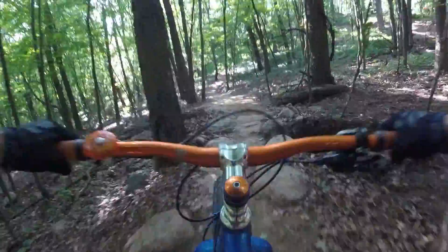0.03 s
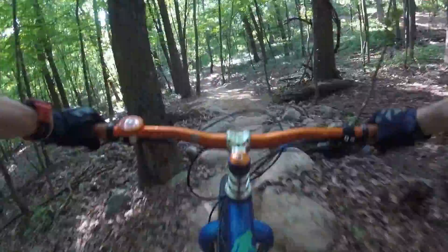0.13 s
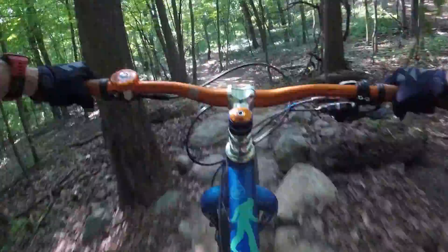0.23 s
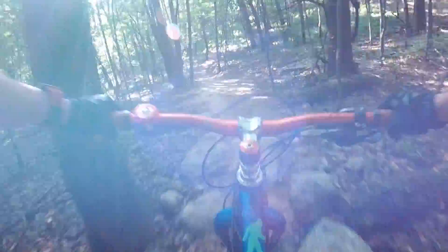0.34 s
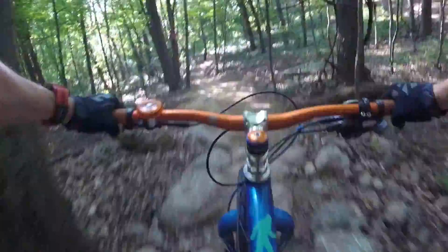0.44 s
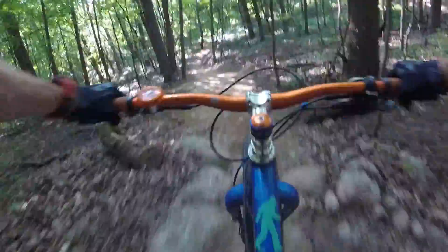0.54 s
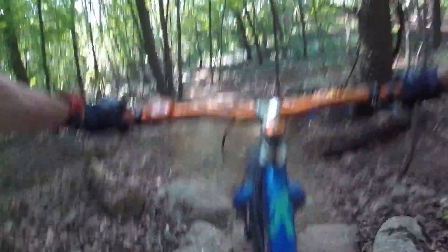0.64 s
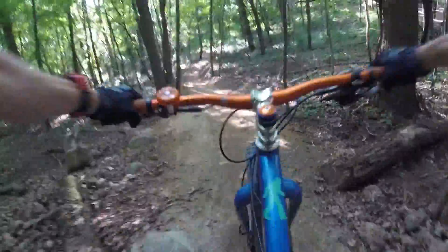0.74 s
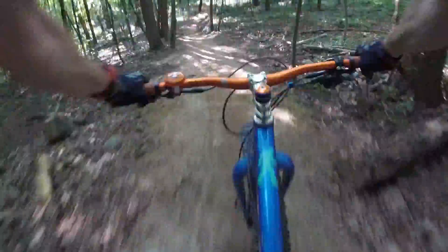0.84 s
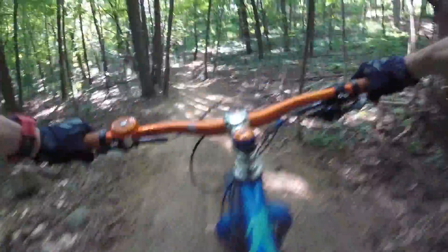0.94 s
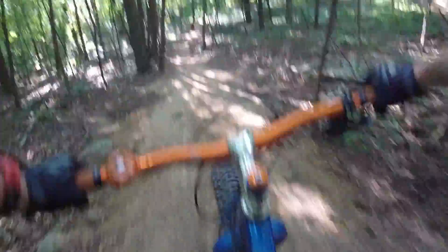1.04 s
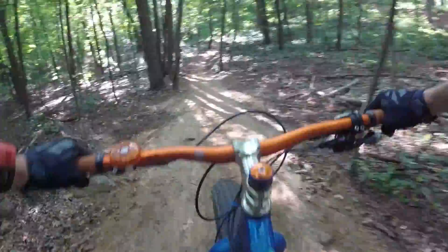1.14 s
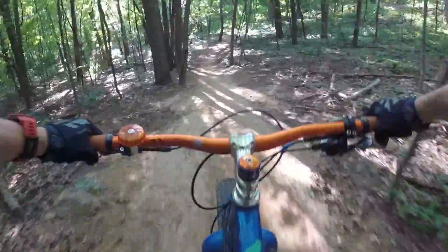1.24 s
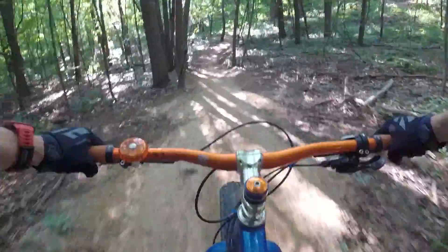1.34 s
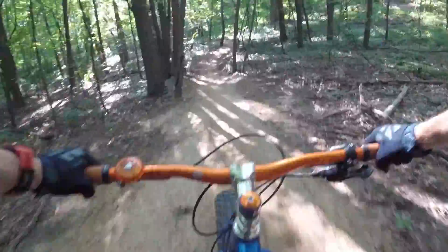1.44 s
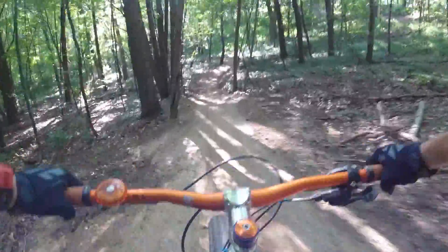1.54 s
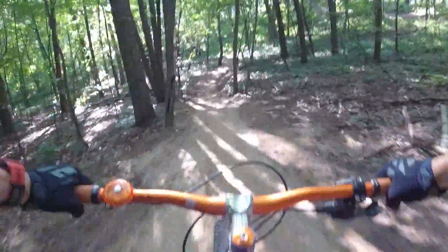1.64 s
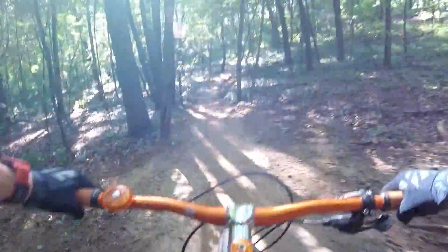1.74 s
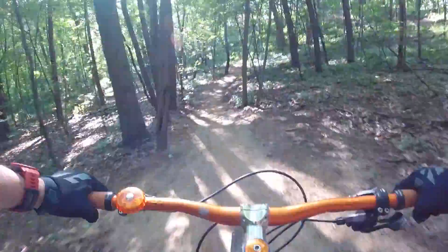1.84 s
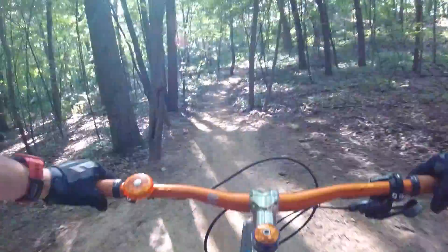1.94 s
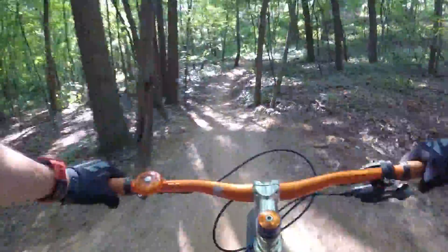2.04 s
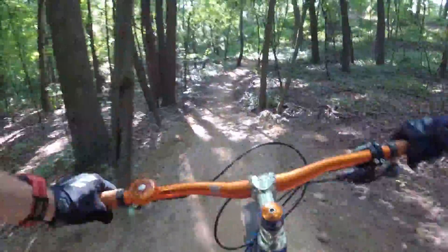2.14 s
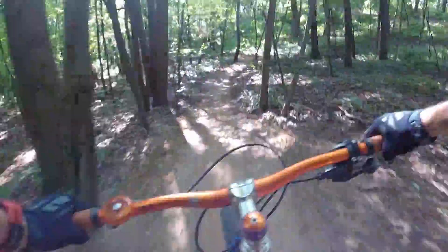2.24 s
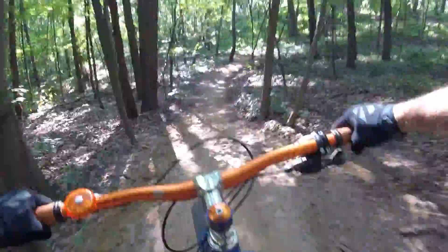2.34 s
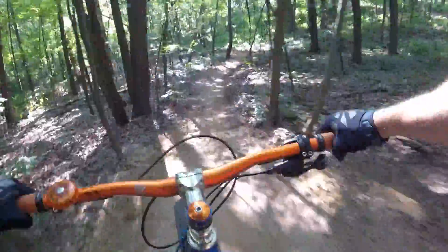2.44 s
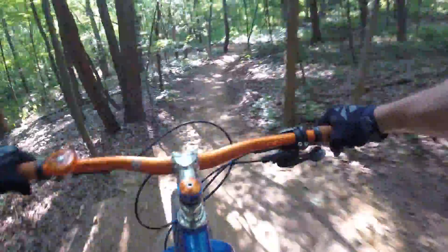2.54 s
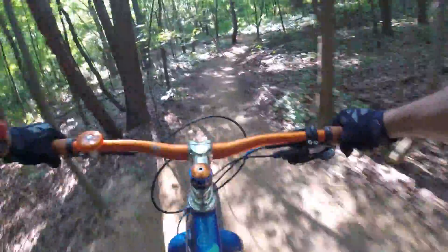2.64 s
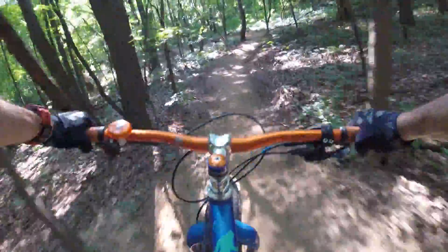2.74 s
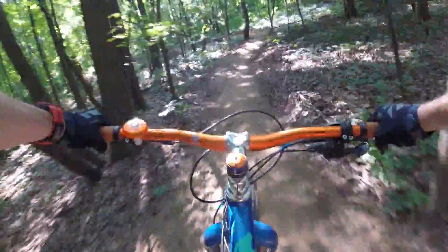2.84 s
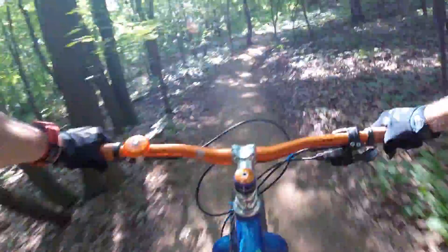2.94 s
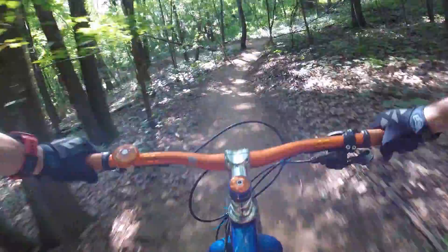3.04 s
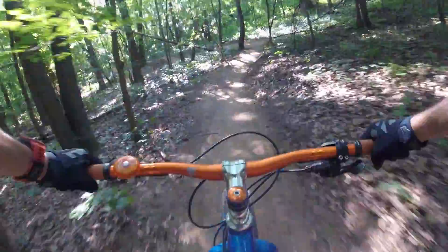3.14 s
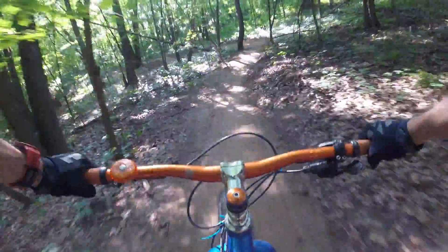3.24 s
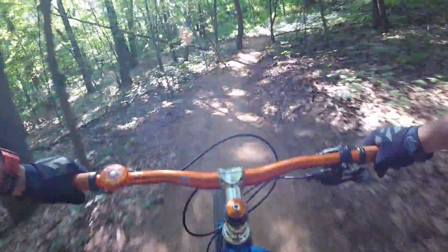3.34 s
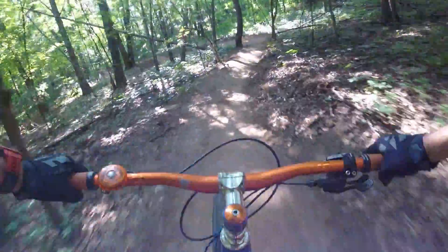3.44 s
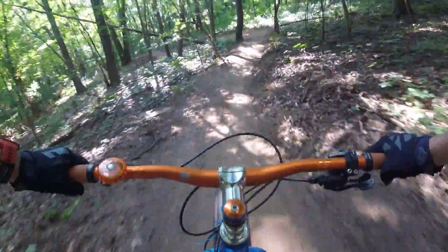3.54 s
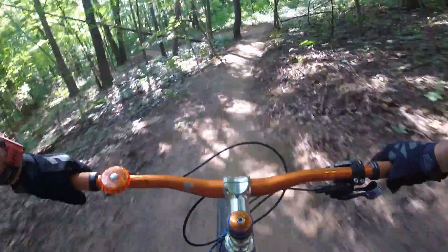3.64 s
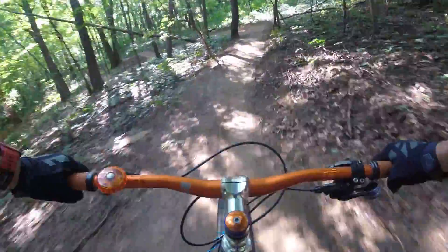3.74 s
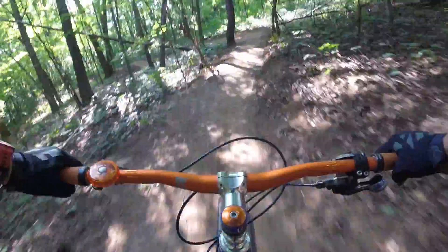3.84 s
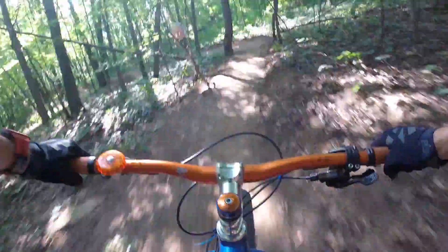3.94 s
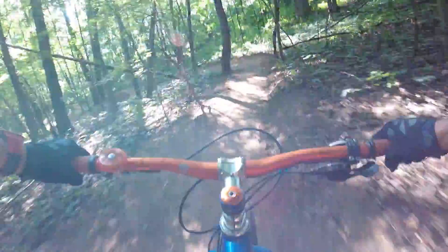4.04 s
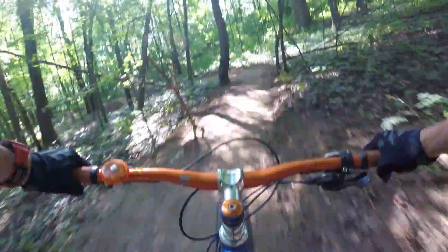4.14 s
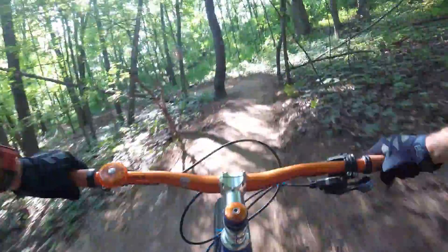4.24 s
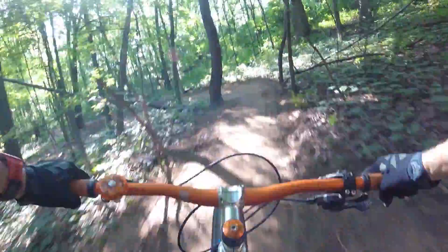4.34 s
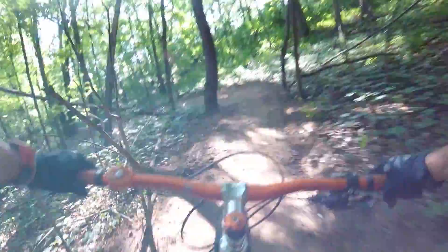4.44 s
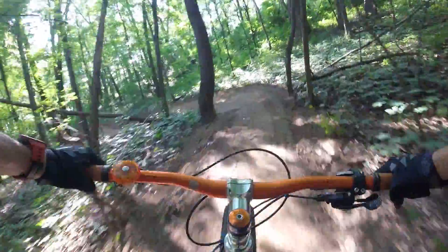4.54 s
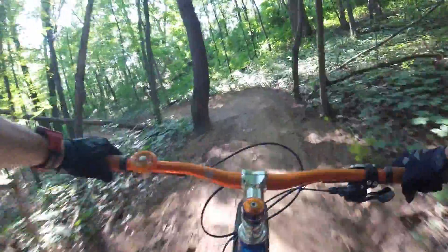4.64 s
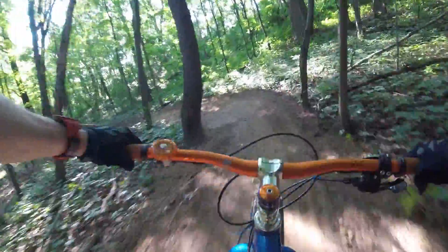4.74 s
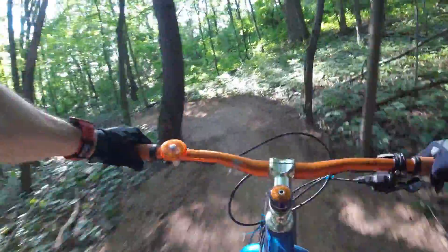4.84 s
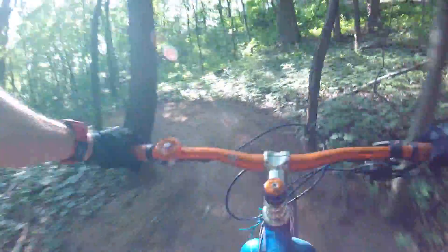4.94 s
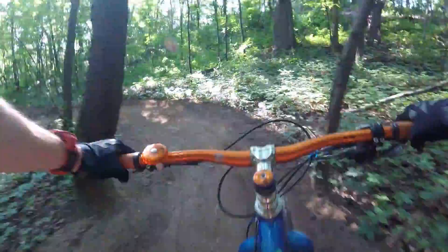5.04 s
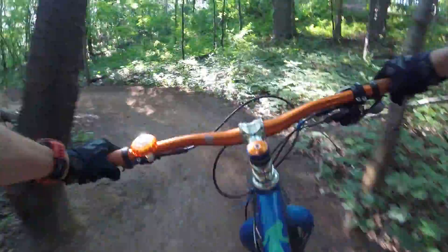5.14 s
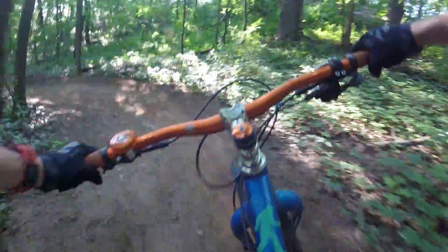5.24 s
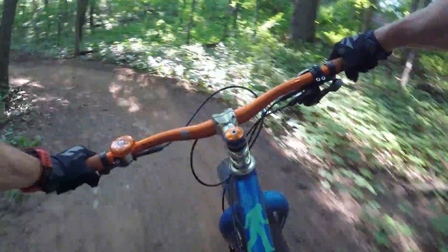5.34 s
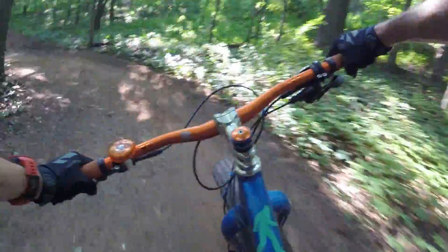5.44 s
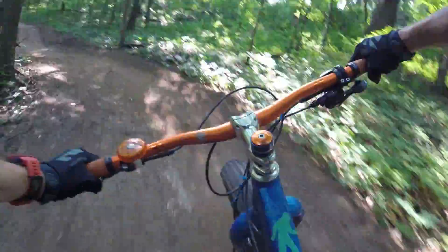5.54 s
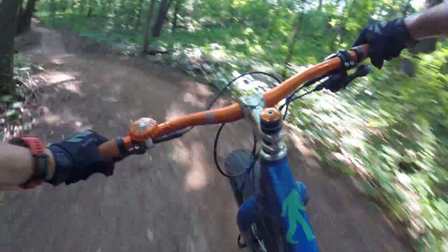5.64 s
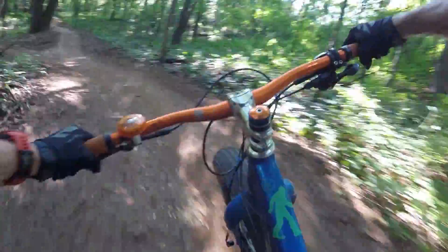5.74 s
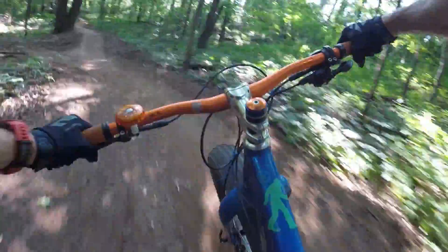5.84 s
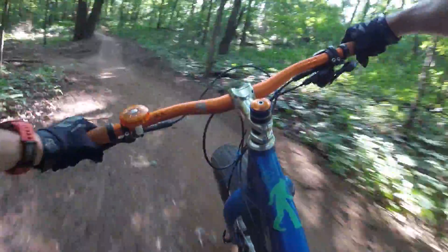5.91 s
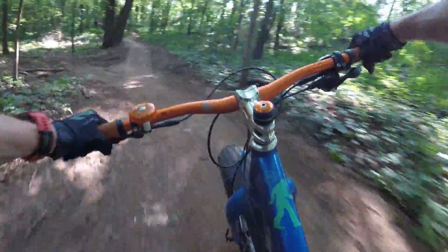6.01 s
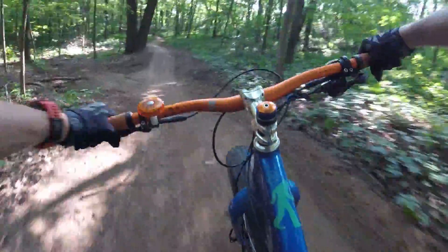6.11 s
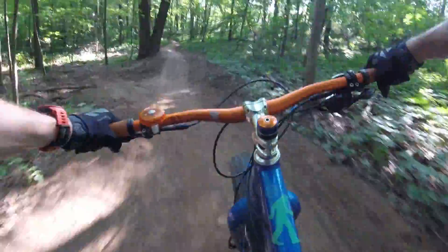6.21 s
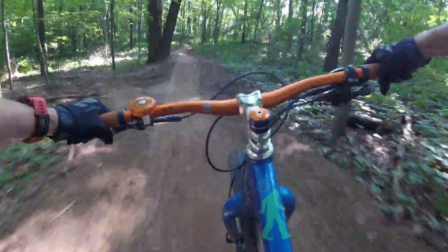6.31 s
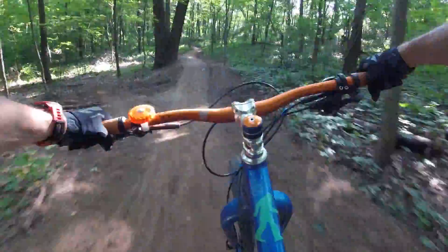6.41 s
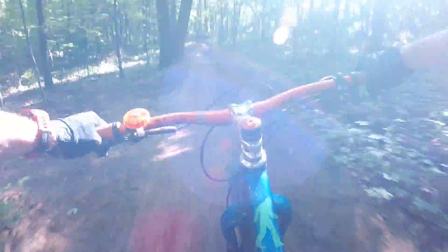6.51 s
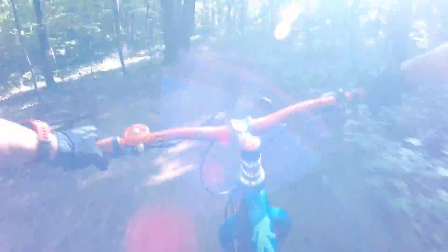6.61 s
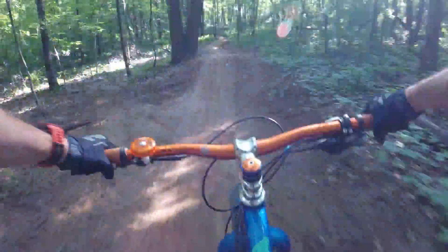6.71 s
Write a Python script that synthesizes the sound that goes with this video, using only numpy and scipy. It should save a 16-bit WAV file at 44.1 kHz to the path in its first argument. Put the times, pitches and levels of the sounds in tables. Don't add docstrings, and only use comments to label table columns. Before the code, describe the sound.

A mountain bike freewheels fast down a dirt forest trail, hub buzzing, chain rattling over rocks, wind thumping and rumbling heavily on a close microphone.

```python
import sys
import numpy as np
from scipy import signal
from scipy.io import wavfile
from scipy.ndimage import uniform_filter1d

SR = 44100
rng = np.random.default_rng(int(sys.argv[2]) if len(sys.argv) > 2 else 0)


def volts_from_db(level):
    exponent = np.asarray(level, float) / 20
    return 10 ** exponent


def wav_out(sig):
    wavfile.write(sys.argv[1], SR, np.round(np.clip(np.atleast_2d(sig).T, -1, 1) * 32767).astype(np.int16))


N = 298557


def rms_one(x):
    return x / np.sqrt(np.mean(x ** 2) + 1e-20)


def in_time(table):
    s, *columns = np.transpose(table)
    return [np.interp(np.arange(N) / SR, s, c) for c in columns]


def band(x, low_hz, high_hz):
    return signal.sosfilt(signal.butter(2, [low_hz, min(high_hz, .45 * SR)], "band", fs=SR, output="sos"), x)


def drift(rate):
    r = np.exp(-40 * np.pi * rate / SR)
    slow = signal.lfilter([1], [1, -2 * r, r * r], rng.standard_normal(N // 20 + 2002))[2000:]
    return np.interp(np.arange(N) / 20, np.arange(len(slow)), rms_one(slow))


def ring(clicks, hz, t60):
    r, w = volts_from_db(-60 / (t60 * SR)), 2 * np.pi * hz / SR
    return signal.lfilter([0, np.sin(w)], [1, -2 * r * np.cos(w), r * r], clicks + 1e-18)


def cycle(t, hz, width):
    turns = t * hz - 1.3
    return -np.cos(2 * np.pi * turns) * np.exp(-(turns / width) ** 2)


def banded_noise(spectrum, shared_db, own_db, rate):
    hz, db = np.transpose(spectrum)
    edges = hz[0] * 2 ** np.arange(0, np.log2(hz[-1] / hz[0]) + .3, 1 / 3)
    out, together, white = 0, drift(rate), rng.standard_normal((2, N + 4000))
    for k, (low, high) in enumerate(zip(edges, edges[1:])):
        level_db = np.interp(np.log(low * high) / 2, np.log(hz), db)
        gain = volts_from_db(level_db + shared_db * together + own_db * drift(rate))
        out = out + band(white[k % 2], low, high)[4000:] * gain
    return rms_one(out)


# [f/Hz, level/dB per Hz]
RUMBLE = [(11, -34), (18, 1), (70, 7.5), (107, 4), (190, -22.5), (250, -33), (320, -33), (550, -120)]
# [t/s, level/dB]
AIRFLOW = [(0, -17), (.3, -11), (.478, -22), (.57, -16.5), (.9, -15), (1.3, -15), (2.08, -16), (2.24, -20),
           (2.5, -7), (2.75, -24), (3.05, -13.5), (3.55, -24), (3.84, -15.5), (4.39, -25), (4.8, -18.5),
           (5.3, -16.5), (5.8, -16), (6.77, -18)]


def wind(gain_db, gust, eddies):
    rumble_db = in_time(AIRFLOW)[0] + gain_db - 6.8 * gust
    stirred = 1 + 2.3 * gust * uniform_filter1d(np.abs(eddies), size=1500)
    return volts_from_db(rumble_db) * stirred * banded_noise(RUMBLE, shared_db=2.2 * gust, own_db=6.5, rate=40)


# [f/Hz, level/dB per Hz]
ROAR = [(120, -24.5), (200, -4), (297, -8), (345, -6), (580, -15), (700, -21.5), (1180, -24), (1460, -58),
        (1900, -55), (2470, -53), (4180, -120)]


def tyres(drum_db, roar_db, gust, eddies):
    drum = rms_one(band(band(rng.standard_normal(N), 66.7, 165.0), 92.4, 335)) * volts_from_db(2.2 * gust * drift(12.6))
    air_hz, air_width_hz = 296.5, 29
    hum = rms_one(band(rng.standard_normal(N), air_hz - air_width_hz / 2, air_hz + air_width_hz / 2))
    hum_gain = volts_from_db(-8 + 4.5 * gust + 1.7 * drift(14.0))
    roar = banded_noise(ROAR, shared_db=3.7 * gust, own_db=2.5, rate=43)
    flare = 1 + 3.3 * gust * uniform_filter1d(np.abs(eddies), size=500)
    sizes = volts_from_db(3.0 * np.minimum(rng.exponential(1, N), 3)) * rng.choice([-1, 1], N)
    grains = sizes * (rng.random(N) < 350 / SR) + 1e-18
    grit = rms_one(band(band(grains, 247, 1230), 260, 1260))
    contact = flare * volts_from_db(-1.5) * (roar + volts_from_db(-8.5) * gust * grit)
    return volts_from_db(drum_db) * drum + volts_from_db(roar_db) * (hum_gain * hum / flare + contact)


# [f/Hz, level/dB per Hz]
PAWL_HISS = [(1410, -37), (2400, -2.5), (2910, -13), (3290, 4), (3890, -4), (5250, -5), (7130, -9),
             (7760, -8), (8380, -16), (9990, -13.5), (11900, -21), (13800, -26), (15000, -33)]
# [f/Hz, level/dB, t60/s]
HUB_MODES = [(1940, 0, .03), (2380, -2, .03), (3265, -3, .03), (3670, -8, .025), (4420, -5, .03),
             (5060, -5, .025), (7820, -9, .015), (9790, -11, .02), (10250, -11, .015), (13020, -21, .015)]
# [t/s, pawl clicks/(1/s)]
WHEEL = [(0.0, 69.6), (0.17, 67.3), (0.32, 59.5), (1.02, 50.2), (1.24, 62.9), (1.68, 63.0), (2.04, 74.5),
         (3.77, 84.4), (4.05, 96.7), (4.37, 85.3), (4.66, 85.9), (5.07, 76.2), (5.39, 77.8), (5.66, 86.8),
         (6.6, 74.0), (6.77, 76.0)]


def freewheel(hiss_db, buzz_db):
    tooth = np.cumsum(in_time(WHEEL)[0] * (1 + .012 * drift(8))) / SR
    at = np.flatnonzero(np.diff(np.floor(tooth)))
    chance = rng.standard_normal((len(at), 1 + len(HUB_MODES)))
    clicks = np.zeros(N)
    clicks[at] = volts_from_db(1.8 * chance[:, 0])
    fall = np.exp(-1 / (.004 * SR))
    puff = rms_one(signal.lfilter([1], [1, -fall], signal.lfilter([.015], [1, -.985], clicks)))
    hiss = rms_one((.5 + puff) * banded_noise(PAWL_HISS, shared_db=.6, own_db=1.8, rate=45))
    buzz = rms_one((0.79 + puff) * band(band(rng.standard_normal(N), 1740, 2700), 1000, 2300))
    shell = 0
    for k, (hz, db, t60) in enumerate(HUB_MODES):
        struck = clicks.copy()
        struck[at] *= volts_from_db(db + 4.0 * chance[:, k + 1] + 2.5 * drift(7)[at])
        shell = shell + band(ring(struck, hz, t60), .95 * hz, 1.05 * hz)
    return volts_from_db(hiss_db) * (hiss + volts_from_db(-5.0) * rms_one(shell)) + volts_from_db(buzz_db) * buzz


def shade(hub, treble_db, spoke_db):
    treble, spokes = band(hub, 8450, 16900), band(hub, 3040, 3780)
    return hub + (volts_from_db(treble_db) - 1) * treble + (volts_from_db(spoke_db) - 1) * spokes


def rush(level_db, gust):
    low_hz, high_hz = 677, 1400
    noise = band(band(rng.standard_normal(N), low_hz, high_hz), 1.15 * low_hz, high_hz)
    return volts_from_db(level_db - 17.5) * (1 - 0.23 * gust) * rms_one(noise)


# [t/s, level/dB, f/Hz]
CLACKS = [(.0613, -31, 1600), (.1172, -24, 1230), (.1671, -22, 1280), (.3155, -23, 1210),
          (.3651, -21, 1360), (.4215, -18, 960), (.623, -13.5, 1140), (.7023, -21.5, 1400),
          (.7477, -21, 1010), (.8385, -20, 1100), (.9613, -24, 1030), (2.191, -32, 800),
          (4.5885, -24, 1000), (4.613, -25, 1280), (4.835, -21.5, 1400), (5.027, -24, 885),
          (6.36, -20, 1140)]


def clacks():
    out, click = np.zeros(N), np.eye(1, 3000)[0]
    t60_s, modes = 0.033, [(0.97, 0), (1.7, -8), (2.9, -22)]
    for s, db, hz in CLACKS:
        at = round(s * SR)
        for ratio, mode_db in modes:
            out[at:at + len(click)] += volts_from_db(db + mode_db) * ring(click, hz * ratio, t60_s / ratio)
    return out


# [t/s, rattle level/dB, t60/s, knock level/dB]
RATTLES = [(0.1181, -14, 0.21, -16.5), (0.165, -15.5, 0.38, -14), (0.24, -19, 0.031, -26),
           (0.316, -12, 0.12, -22), (0.365, -3.5, 0.14, -16), (.415, -5, 0.085, -22),
           (.498, -10, 0.14, -12), (0.5486, -12, 0.28, -6), (0.5758, -13, 0.03, -11.5),
           (0.623, 0, 0.055, -28), (0.699, -13, 0.27, -36), (0.837, -9, 0.14, -23),
           (0.916, -10, 0.055, -12), (2.3212, -14.5, 0.056, -14), (2.4386, -12, 0.017, -30),
           (4.8312, -18, 0.063, -10), (5.028, -11, 0.021, -28), (5.107, -37.5, 0.37, -41)]


def rattles():
    out, t = np.zeros(N), np.arange(6000) / SR
    hz = 1086
    for s, peak_db, t60, _ in RATTLES:
        sizes = volts_from_db(8.2 * np.minimum(rng.exponential(1, len(t)), 3)) * rng.choice([-1, 1], len(t))
        clicks = sizes * (rng.random(len(t)) < 3500 / SR) + 1e-18
        body = rms_one(band(band(clicks, .5 * hz, 1.49 * hz), 0.048 * hz, 2.8 * hz))
        links = rms_one(band(clicks[::-1], 1400, 3560))
        fade = volts_from_db(peak_db - 12.5 - 60 * t / max(t60, .01)) * np.minimum(t / 0.00093, 1)
        at = round(s * SR)
        out[at:at + len(t)] += fade * (body + volts_from_db(-16.5) * links)
    return out


# [t/s, peak level/dB, brightness/dB]
STONES = [(0.4049, -26, 16), (0.4186, -21, 2), (0.4316, -28, -1), (0.4573, -17, -3),
          (0.4674, -11.5, -8), (0.9727, -5, -3), (2.1903, -14.5, -21), (2.2138, -25, -9),
          (2.2611, -15, -15), (2.3072, -19, -6), (2.3225, -35, -8), (2.3952, -24, -13),
          (2.4288, -28, -6), (2.4364, -9.5, -11), (2.506, -17, -7), (2.5612, -12, -13),
          (2.5857, -21, -1), (2.5954, -13, -14), (2.6218, -14.5, -11), (2.7509, -15, -8),
          (2.9029, -4.5, -16), (2.929, -16, -7), (2.938, -15, -6), (2.9456, -26, -7),
          (2.9563, -13.5, -13), (2.975, -16, -8), (2.9957, -7, -19), (3.0118, -4.5, -17),
          (3.04, -7.5, 4.5), (3.0636, -25, -12), (3.1, -9, 1), (3.1212, -16, -4), (3.1494, -16, 12),
          (3.156, -12, -7), (3.1657, -28, -12), (3.173, -10.5, 7), (3.1826, -25, -12),
          (3.2004, -18, -9), (3.2081, -9.5, -12), (3.2229, -17, 2), (3.2325, -21, -9),
          (3.2412, -25, -4), (3.2506, -7.5, 11), (3.2592, -7, 4), (3.2873, -15, -10),
          (3.2953, -11.5, 4), (3.326, -8.5, 3), (3.3838, -9.5, 5), (3.3993, -8.5, -5),
          (3.417, -14.5, 7), (3.4244, -9, 0), (3.5043, -20, 9), (3.536, -23, 12), (3.57, -21, 11),
          (3.5887, -14, -4),
          (3.6056, -11, 3), (3.6529, -16, 8.5), (3.6837, -11, -13), (3.7076, -8, 3.5),
                 (3.7204, -13, 3), (3.7416, -19, -7), (3.7603, -15, -10), (3.7797, -11.5, -1),
                 (3.7868, -11, 6), (3.8086, -11.5, -2), (3.8241, -17, -5), (3.8341, -10.5, 3),
                 (3.8538, -17, -4), (3.8882, -16, 0), (3.9034, -15.5, 2), (3.9157, -14, -6),
                 (3.9281, -8, -2), (3.9438, -21, -8), (4.0707, -10, 5.5), (4.0971, -19, 14),
                 (4.1178, -15, -7), (4.1507, -22, -2), (4.1662, -24, 1), (4.1863, -15, -5),
                 (4.2051, -10, -12), (4.2228, -8.5, 0), (4.2566, -12, -7), (4.2666, -8.5, -1),
                 (4.2814, -10.5, -3), (4.3305, -14, 3), (4.3421, -28, -5), (4.3512, -14, 8),
                 (4.363, -19, -14), (4.3744, -10.5, 6.5), (4.413, -19.5, 9.5), (4.4581, -19, -5),
                 (4.5875, -7, 6), (4.611, -13, -8), (4.8055, -18, 0), (4.815, -10.5, -2), (4.8365, -10, 0),
                 (4.8449, -12, -13), (4.8536, -19, -7), (4.8612, -18, 7), (4.9027, -24, -12),
                 (4.9152, -17, 3), (4.9345, -8, -7), (4.9486, -11.5, -15), (4.9752, -7, -11),
                 (4.9902, -10, -9), (5.0294, -9, 2), (5.085, -26, -8), (6.3629, -13, -0.5),
                 (6.5708, -15, -5), (6.5829, -17.5, 15.5),
          (1.972, -21.5, -12), (2.284, -22, 0), (2.484, -18, -4), (2.898, -12, -8), (3.637, -20, -4),
          (4.244, -13, -5), (4.886, -22, 0), (5.083, -26, -8), (5.133, -21.5, -8), (5.175, -22.5, -10),
          (5.204, -25, -9), (5.226, -15.5, -13)]


def snaps():
    knocks = [(s, knock_db, -1) for s, _, _, knock_db in RATTLES]
    rows = knocks + STONES
    t, lead = np.arange(1800) / SR, .012
    out, spread = np.zeros(N + len(t)), volts_from_db(.8 * rng.standard_normal((len(rows), 2)))
    noise = band(band(rng.standard_normal((len(rows), len(t))), 317, 1190), 363, 1230)
    swell_s, fade_s = np.maximum(lead + 0.0024 - t, 0), np.maximum(t - lead - .003, 0)
    envelope = np.exp(-fade_s / 0.0036 - swell_s / 0.003)
    for (s, snap_db, bright_db), rough, (dull, sharp) in zip(rows, noise, spread):
        bright = volts_from_db(bright_db - 14.0) * cycle(t - lead - .0003, 1550 * sharp, 0.98)
        snap = cycle(t - lead, 650 * dull, 0.27) + bright
        at = round((s - lead) * SR)
        out[at:at + len(t)] += volts_from_db(snap_db + 0.5) * (snap + volts_from_db(-9.5) * rms_one(rough) * envelope)
    slam_s, slam_db, slam_hz = .9862, 2.5, 560
    at = round((slam_s - 0.82 / slam_hz) * SR)
    out[at:at + len(t)] += volts_from_db(slam_db) * cycle(t, slam_hz, .6)
    return out[:N]


# [t/s, level/dB, t60/s]
SLAPS = [
    (0.244, -39, 0.032),
    (0.407, -31, 0.03),
    (.55, -43, .12),
    (.623, -40, 0.029),
    (5.026, -32.5, 0.033),
    (5.071, -66, 0.23),
]


def slaps():
    out, t = np.zeros(N), np.arange(6000) / SR
    for s, db, t60 in SLAPS:
        clicks = rng.standard_normal(len(t)) * (rng.random(len(t)) < 900 / SR) + 1e-18
        jingle = sum(rms_one(ring(clicks, hz, 0.0059)) for hz in (3380, 5030))
        tick = 0.91 * rms_one(band(clicks, 3100, 6200))
        at = round(s * SR)
        out[at:at + len(t)] += volts_from_db(db - 60 * t / max(t60, .01)) * (jingle + tick)
    return out


# [t/s of the dip, swing level/dB, dip-to-push time/ms]
EDDIES = [(0.2984, -8, 3.6), (0.3056, -15, 3.0), (0.3875, -11, 5.4), (0.4098, -13.5, 4.8),
          (0.4268, -5.5, 2.6), (0.4524, -6, 2.3), (0.4943, -2.5, 3), (0.5074, -6, 5.4),
          (0.6507, -16, 3.6), (0.6628, -2.5, 2), (0.979, -5.5, 2.05), (0.991, -3, 4),
          (1.973, -6.5, 5.6), (2.1815, -7.5, 5.5), (2.2125, -6, 10), (2.2239, -1.5, 6.7),
          (2.2384, -9, 6.3), (2.2641, -9.5, 2.6), (2.2999, 1, 8.9), (2.3088, -3, 13),
          (2.3299, -4.5, 27), (2.3567, -16, 3.6), (2.3991, -6.5, 13), (2.4239, -7, 3.8),
          (2.4394, -12, 5), (2.4712, -8.5, 3.3), (2.501, -6.5, 20), (2.518, -24, 4.6),
          (2.5629, -10.5, 1.9), (2.5824, -2.5, 8.6), (2.6251, -5.5, 3.3), (2.6409, -7, 3.9),
          (2.899, -4, 16), (2.9129, -3, 3.5), (2.9411, -3, 1.64), (2.998, -9, 4.0),
          (3.015, -5.5, 1.9), (3.0231, -17.5, 5.5), (3.033, -6, 12), (3.0569, -10.5, 4.7),
          (3.067, -5.5, 4.5), (3.0804, -13, 2.4), (3.0966, -1, 8.1), (3.1217, -3.5, 2.5),
          (3.1536, -11, 4.1), (3.1611, -8, 5.6), (3.1721, -0.5, 2.1), (3.1815, -8, 4.4),
          (3.2067, -8, 3.9), (3.2253, -16, 3.9), (3.2483, -7.5, 4.7), (3.2643, -16, 3.4),
          (3.2971, -8, 4.7), (3.326, -5, 3.6), (3.3384, -7.5, 5.7), (3.3483, -5.5, 2),
          (3.3808, -7, 3.3),
          (3.3896, -13, 3.3), (3.3971, -3, 3.1), (3.4159, -5.5, 2.6), (3.4273, -10.5, 7),
                 (3.4359, -7.5, 2.5), (3.496, -8, 5.2), (3.5385, -6.5, 5.4), (3.554, -10, 2.6),
                 (3.5616, -5, 7.3), (3.5704, -4.5, 1.74), (3.5908, -4, 1.5), (3.6093, -3, 2.1),
                 (3.6862, -5.5, 4.4), (3.694, -7, 1.8), (3.7092, -12, 3.5), (3.7226, -6, 4.1),
                 (3.7451, -7, 11), (3.778, -8, 3.8), (3.7914, -4.5, 1.75), (3.8248, -4.5, 3.7),
                 (3.837, -12, 1.9), (3.8572, -2, 2.7), (3.9117, -9, 6.9), (3.9296, -11, 5.3), (4.06, -7, 4),
                 (4.074, -14, 4.2), (4.0931, -7, 8.8), (4.11, -8.5, 6.1), (4.1234, -15, 2.7),
                 (4.1524, -6.5, 4.0), (4.1707, -13, 2.5), (4.1875, -6, 3.1), (4.2127, -9, 4),
                 (4.222, -4.5, 3.5), (4.2695, -5.5, 3.7), (4.2852, -3.5, 1.54), (4.3292, -6, 3.1),
                 (4.352, 0, 3.3), (4.3783, -10, 5.5), (4.4157, -7, 3), (4.573, -9, 5.3),
                 (4.5908, -4.5, 2.5), (4.6099, -1.5, 2.3), (4.6316, -4, 2.4), (4.763, -9, 2.2),
                 (4.81, -17, 7.1), (4.833, -4.5, 5.3), (4.8892, -6, 3.1), (4.9082, -6, 3.7),
                 (4.9172, -4, 2.5), (4.948, -6, 5.7), (4.9789, -6, 2), (4.985, -6, 8.3), (5.0288, -3, 8.1),
                 (5.0799, -5.5, 3.9), (5.1734, -7, 5.9), (5.2196, -6, 2.5), (5.3995, -5, 10),
                 (6.48, -3, 2.7),
          (0.432, -4, 6.2), (0.464, -9, 2.2), (2.695, -19, 2.2), (3.282, -7, 3), (3.762, -7, 3.1),
                (3.901, -12, 2.3), (3.947, -10, 3.2), (4.46, -17.5, 4), (4.782, -12, 5.7),
                (4.815, -6.5, 4.1), (4.934, -13.5, 2.2), (5.143, -23, 4), (5.204, -15, 1.3),
                (5.428, -11.5, 5.2)]


def thumps():
    out, t_ms = np.zeros(N + 4000), np.arange(-600, 2400) / SR * 1000
    for s, swing_db, ms in EDDIES:
        rise_ms, dip_ms = min(0.623 * ms, 2.56), min(0.3 * ms, 1.84)
        push = np.maximum(t_ms - ms + rise_ms, 0) / rise_ms
        dip = np.exp(-(t_ms / np.where(t_ms < 0, 1.3, 1) / dip_ms) ** 2)
        at = round(s * SR) - 600
        out[at:at + len(t_ms)] += volts_from_db(swing_db) * (0.81 * push * np.exp(1 - push ** 1.1) - 1.7 * dip)
    return signal.sosfilt(signal.butter(2, 38, "high", fs=SR, output="sos"), out[:N])


# [t/s, level/dB, f/Hz]
THUDS = [
    (.421, -17, 446),
    (0.504, -3.5, 405),
    (.661, -1.5, 410),
]


def thuds():
    t = np.arange(N) / SR
    return sum(volts_from_db(db) * cycle(t - s + 1.0 / hz, hz, 0.83) for s, db, hz in THUDS)


# [start t/s, length/s, level/dB, f/Hz]
HUMS = [(0.468, 0.13, -35, 300), (2.66, 0.18, -26.5, 305), (3.93, 0.13, -24, 304.4),
        (4.137, 0.085, -23, 294.3), (4.48, 0.058, -23.5, 305), (4.64, .08, -19, 310),
        (5.763, 0.13, -20.5, 298), (6.028, 0.12, -21, 265), (6.176, 0.087, -17, 250),
        (6.28, 0.091, -13, 256), (6.442, .08, -21, 240), (6.556, 0.092, -19, 250)]


def hums():
    t, waver = np.arange(N) / SR, np.cumsum(1 + 0.0406 * drift(23.8)) / SR
    out = np.zeros(N)
    for s, length, db, hz in HUMS:
        swell = np.sin(np.pi * np.clip((t - s) / length, 0, 1)) ** 0.51
        out += volts_from_db(db) * swell * np.sin(2 * np.pi * hz * waver)
    return volts_from_db(4.0 * drift(30)) * out


def spray():
    start_s, top_s, end_s = .915, .968, .986
    swell = np.interp(np.arange(N) / SR, [start_s, top_s, end_s, end_s + .002], [0.13, 0.93, 1.0, 0.027])
    return volts_from_db(-36) * swell * rms_one(band(rng.standard_normal(N), 1600, 4640))


def ducking(slower):
    duck_s, fall_s, release_s = 1, 0.0015, 0.076
    t = np.arange(N) / SR
    onset = np.clip((t - duck_s) / fall_s, 0, 1)
    dip = -16 * onset * np.exp(-(np.maximum(t - duck_s, 0) / (slower * release_s)) ** 3)
    held = -11.5 * onset * np.interp(t, [1.74, 2.37], [1, 0])
    return dip, held


# [t/s of the dip, level/dB]
SOFT_EDDIES = [(5.7296, -1), (5.7928, -6.0), (5.8162, -11), (6.0364, -7), (6.0739, -4), (6.1003, -8),
               (6.1308, -4), (6.1434, -1), (6.158, -7), (6.177, -1), (6.1918, 0), (6.2069, -2), (6.2326, 0.5),
               (6.2978, -3), (6.327, -11), (6.3388, -4), (6.3782, -10), (6.404, -2), (6.4655, 0), (6.644, -6.5),
               (6.6959, -3.5), (6.7068, -7), (6.713, -5), (6.72, -7.0), (6.7312, -1), (6.76, 1), (6.766, -11)]


def soft_eddies():
    t, hz = np.arange(N) / SR, 151
    return sum(volts_from_db(db - 1.5) * cycle(t - s + 1.25 / hz, hz, 0.56) for s, db in SOFT_EDDIES)


# [t/s, gustiness/0-1]
GUST = [(0, .6), (.95, .6), (1.05, .35), (2.05, .35), (2.25, 1), (5.3, 1), (5.6, .2), (6.77, .25)]
# [t/s, carcass load level/dB, knob scrub level/dB]
GROUND = [(0, -16, -36.5), (.26, -12, -36), (.46, -22.5, -25.5), (.6, -30, -28), (.86, -18, -35),
          (1.2, -15, -35), (1.5, -10.5, -33), (2.05, -17.5, -29), (2.33, -18.5, -28), (2.72, -29.5, -30.5),
          (3.2, -23.5, -26), (3.57, -25, -32), (4.2, -27, -26), (4.5, -34, -31), (4.93, -30.5, -29.5),
          (5.42, -20.5, -35), (5.54, -22.5, -30), (6.05, -11.5, -27), (6.77, -16, -30.5)]
# [t/s, level/dB, treble level/dB, spoke band level/dB]
HUB = [(0, -45, 0.5, 6), (.5, -43, 0.5, 0.5), (.75, -49, 0, 3.5), (2.9, -45.5, 4.5, -2), (3.6, -52, 4, .5),
       (4.15, -48.5, 4, 0), (4.5, -51.5, 3.5, 1.5), (5.1, -46, 2, -2), (5.44, -51, 1, .5),
       (5.9, -45.5, -2, .5), (6.77, -49, 1, 4)]


def scene():
    gust, = in_time(GUST)
    load_db, scrub_db = in_time(GROUND)
    hub_db, treble_db, spoke_db = in_time(HUB)
    dip, held = ducking(1)
    bass_db = held + 1.35 * ducking(1.95)[0]
    roar_db = scrub_db + 11.5 - 8.6 * gust + held + 0.61 * ducking(1.24)[0]
    buzz_db = 2 + hub_db + 0.094 * (scrub_db - hub_db) - 6.9 * gust + held + 0.21 * dip
    eddies = thumps() + snaps()
    air = wind(bass_db, gust, eddies) + eddies + rush(roar_db + 0.49 * held, gust)
    hub = shade(freewheel(hub_db + held + dip, buzz_db), treble_db, spoke_db)
    ground = tyres(load_db + bass_db, roar_db, gust, eddies) + thuds() + hums() + spray() + soft_eddies()
    frame = clacks() + rattles() + slaps()
    return (air + hub + ground + frame)[None]


def band_limit(x):
    return signal.sosfilt(signal.butter(12, 15150, fs=SR, output="sos"), x)


def record(dry):
    dip_hz, width_hz = 11600, 1850
    notched = signal.lfilter(*signal.iirnotch(dip_hz, dip_hz / width_hz, fs=SR), dry)
    heard = 0.33 * dry + 0.58 * notched
    rounded = 1.1 * np.tanh(heard)
    finished = signal.sosfilt(signal.cheby2(6, 40, 15700, fs=SR, output="sos"), rounded)
    return band_limit(finished)


dry = scene()
out = record(dry)
wav_out(out)
```